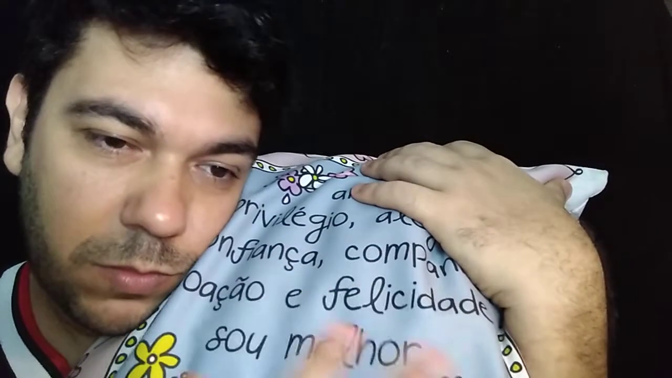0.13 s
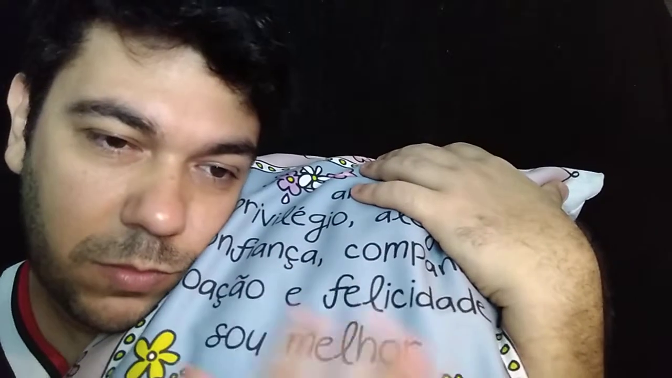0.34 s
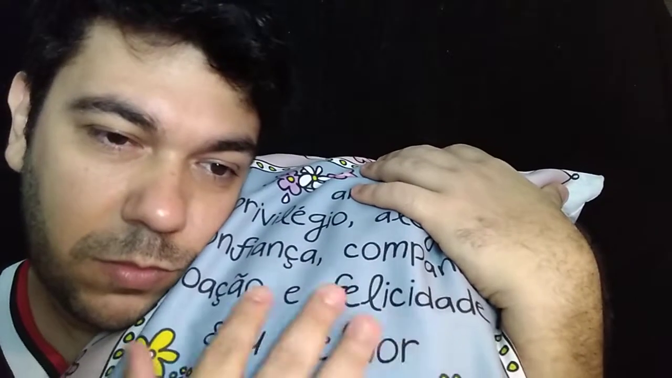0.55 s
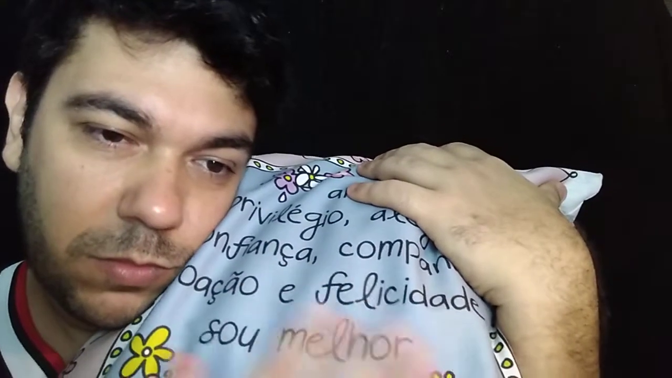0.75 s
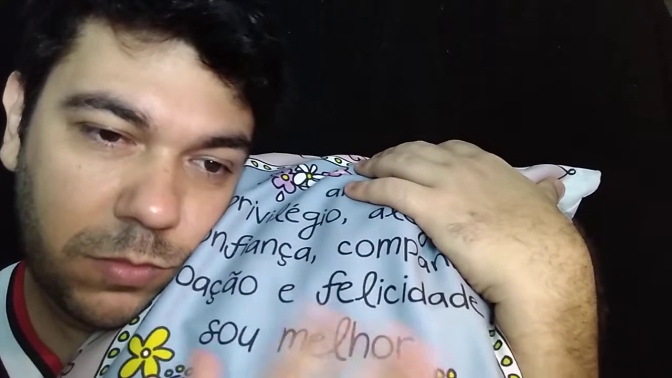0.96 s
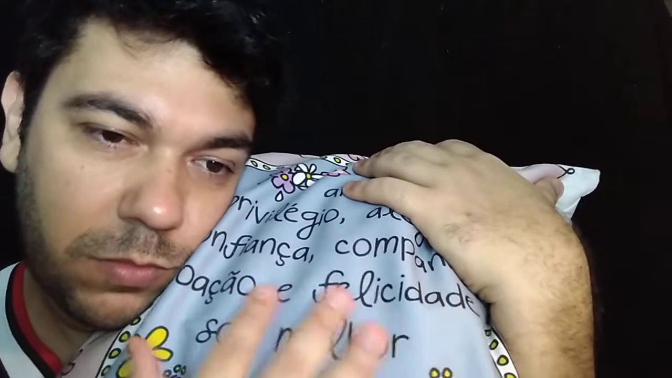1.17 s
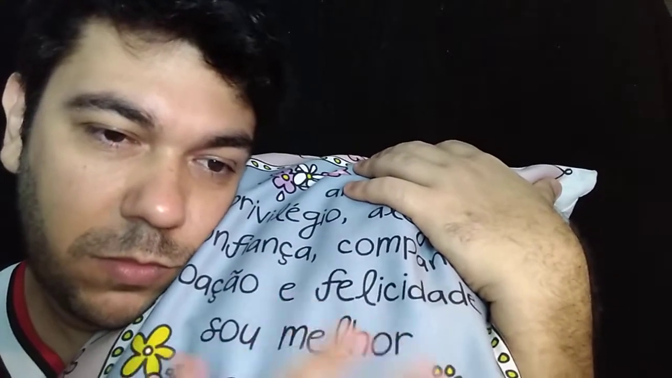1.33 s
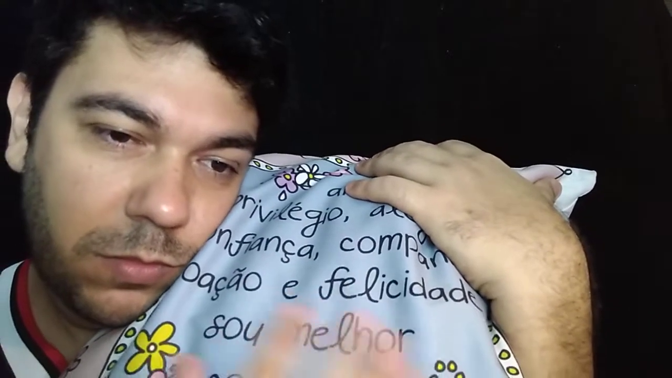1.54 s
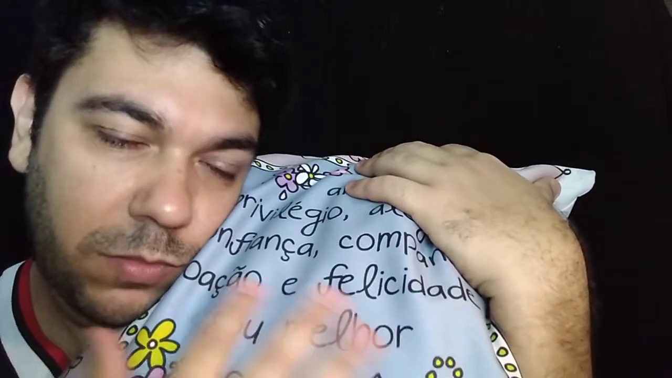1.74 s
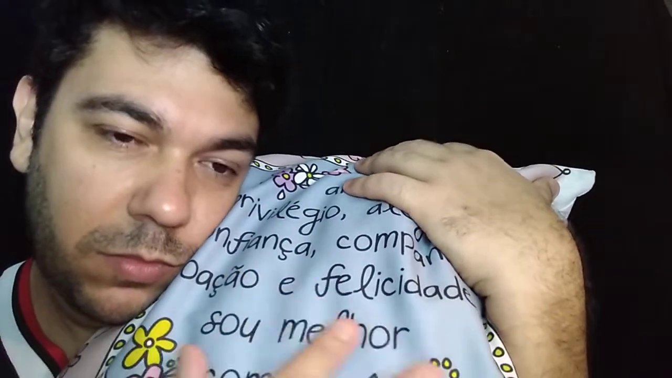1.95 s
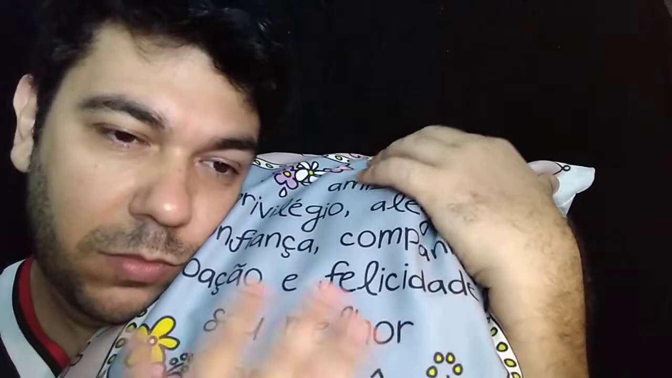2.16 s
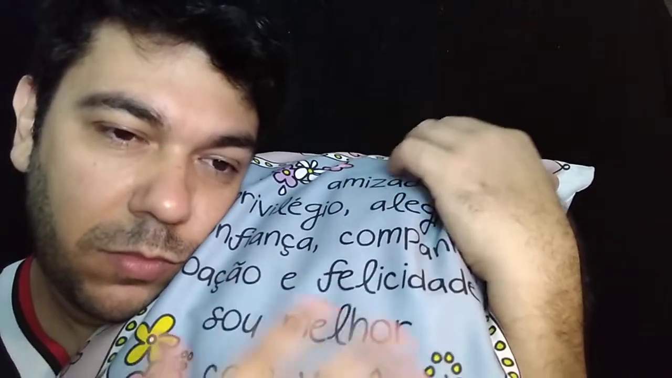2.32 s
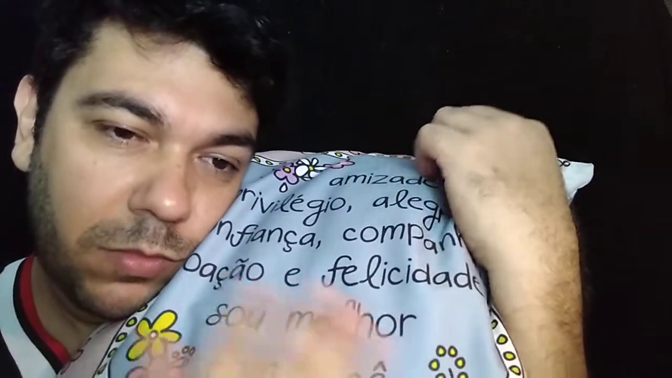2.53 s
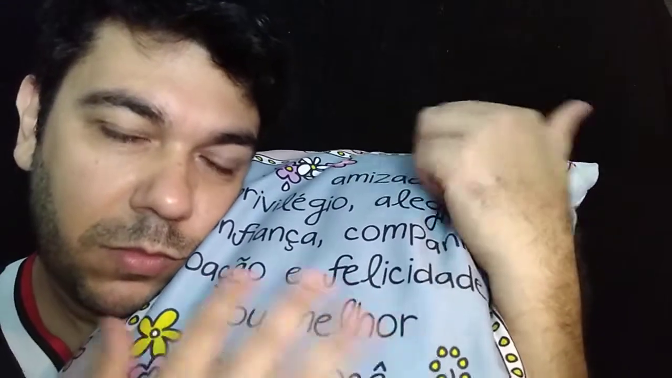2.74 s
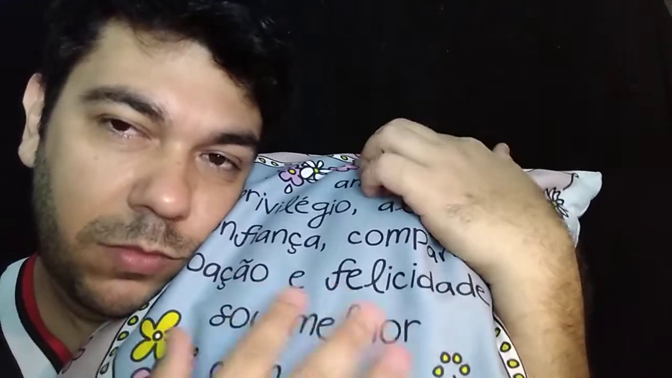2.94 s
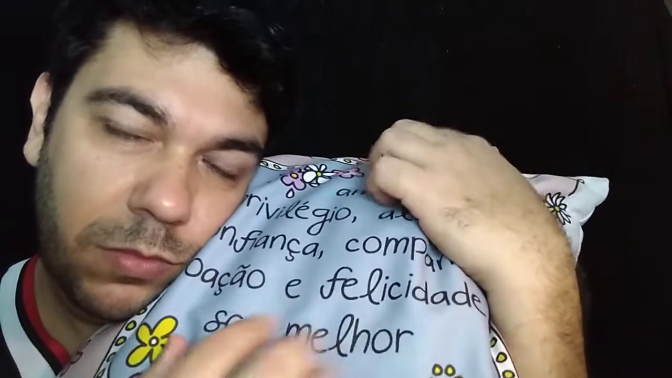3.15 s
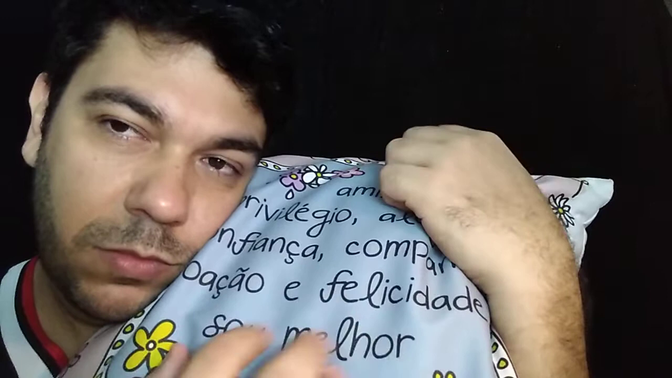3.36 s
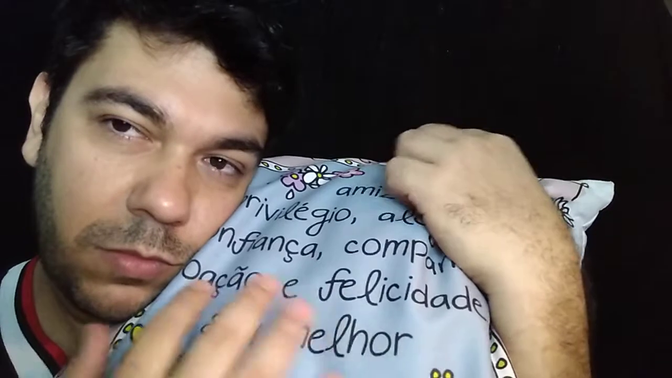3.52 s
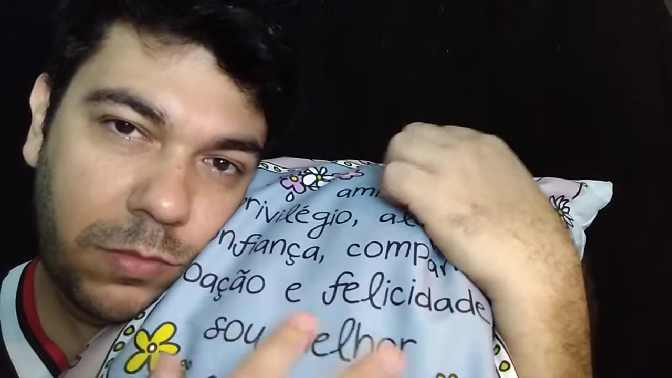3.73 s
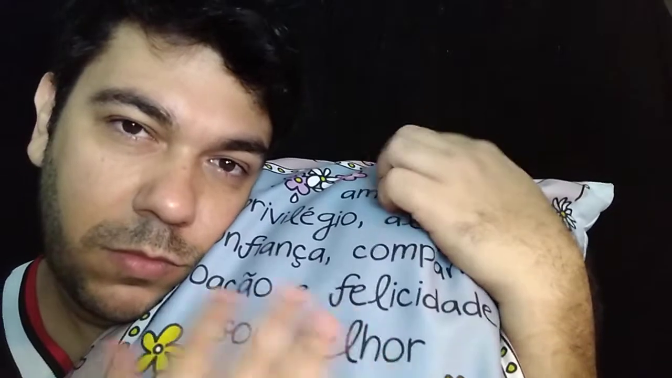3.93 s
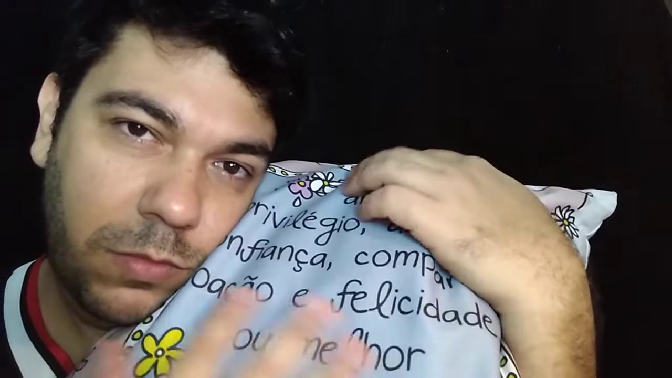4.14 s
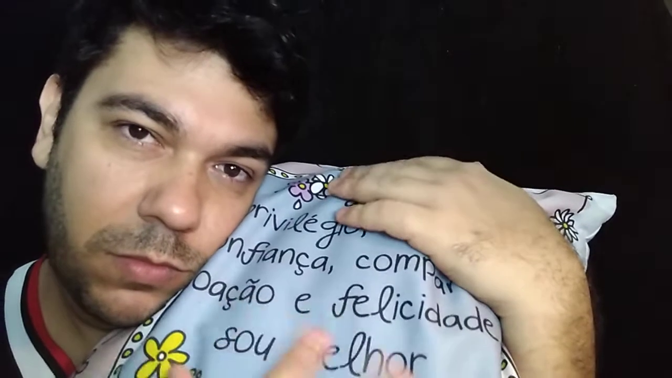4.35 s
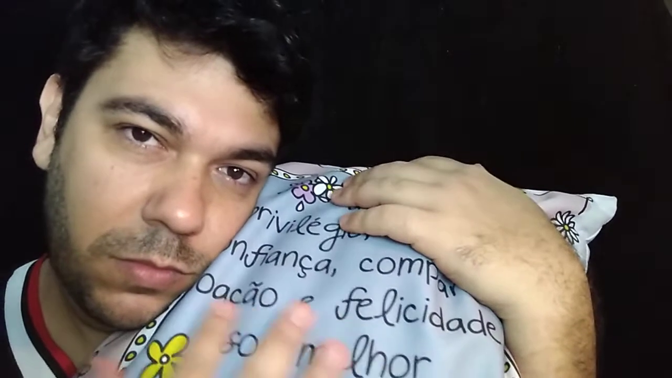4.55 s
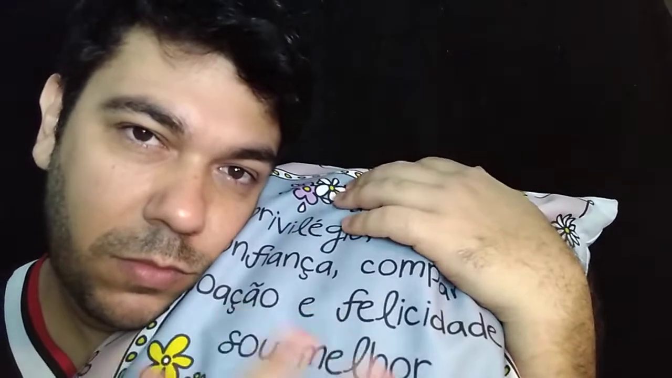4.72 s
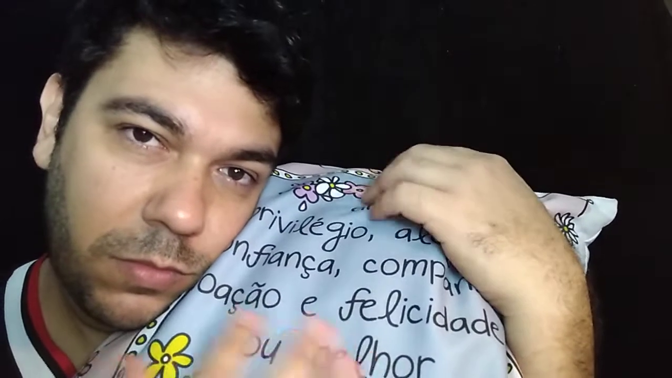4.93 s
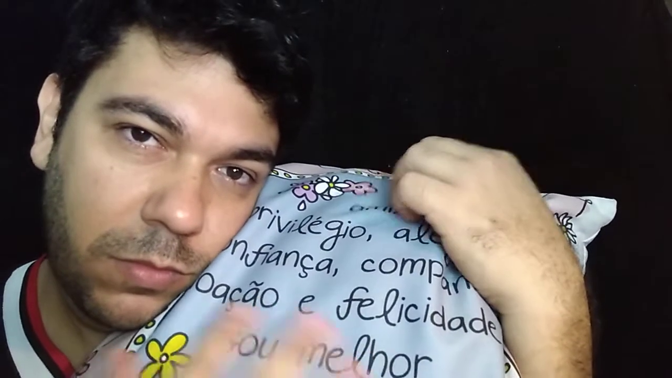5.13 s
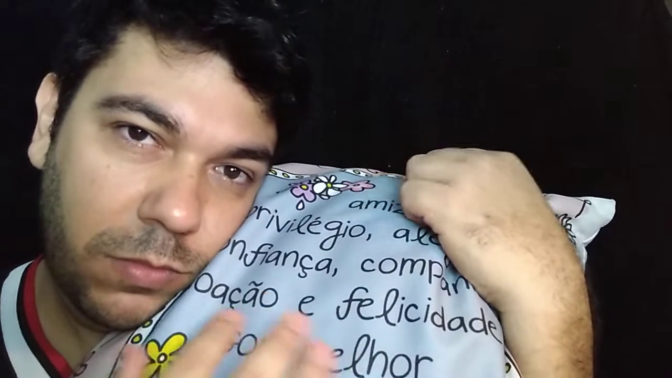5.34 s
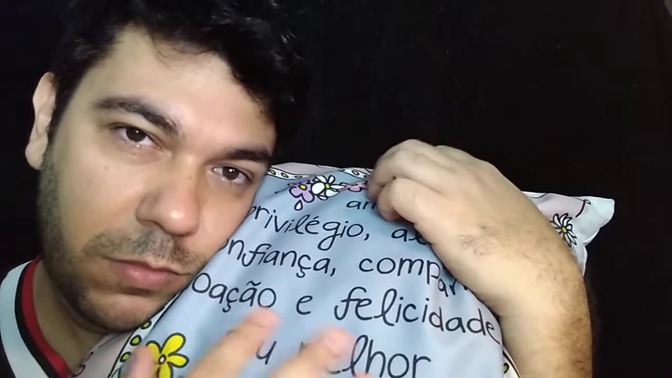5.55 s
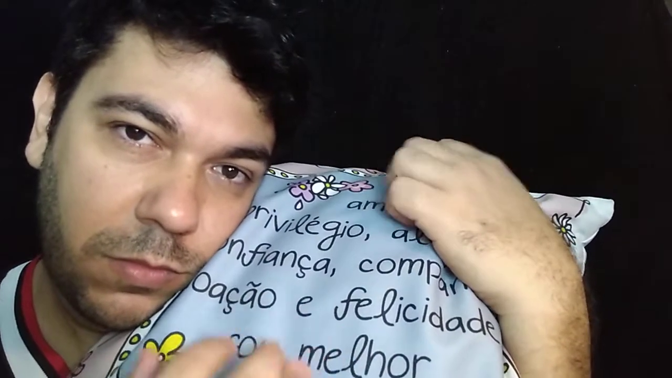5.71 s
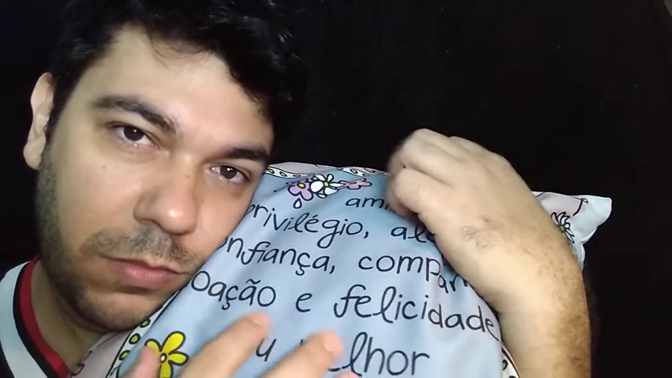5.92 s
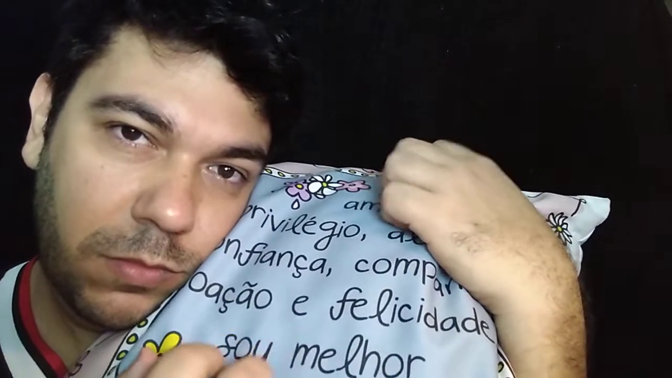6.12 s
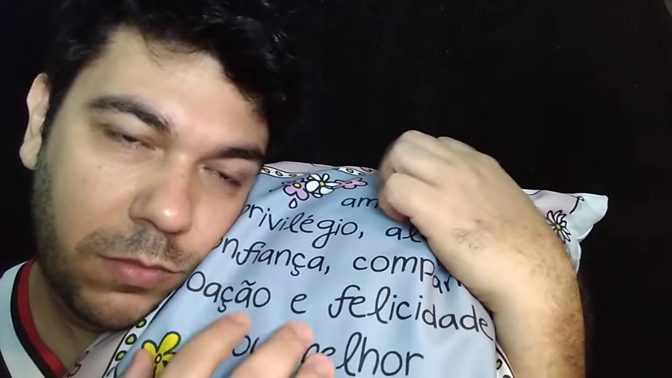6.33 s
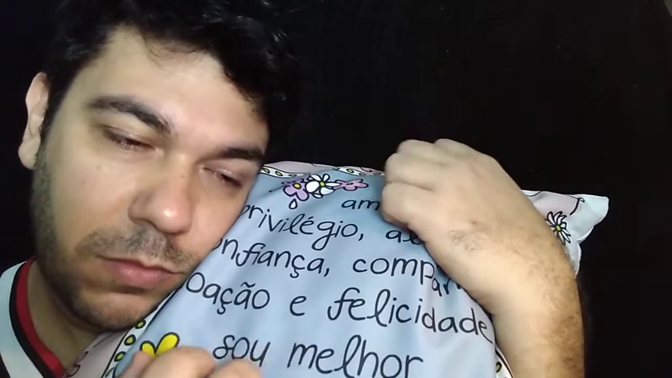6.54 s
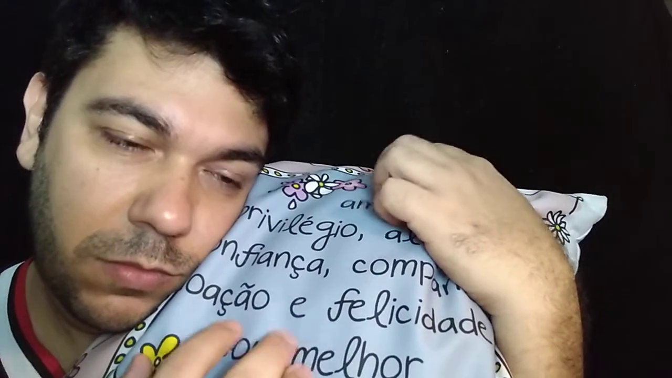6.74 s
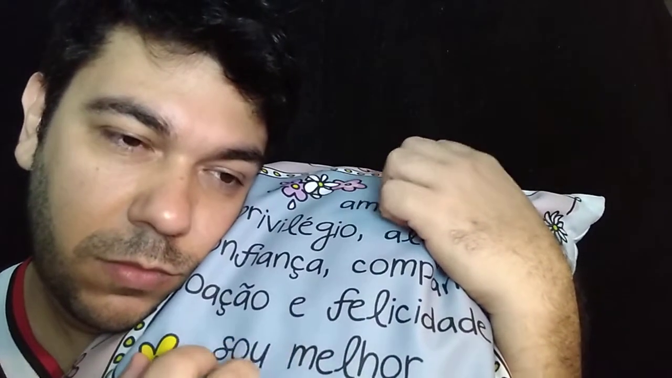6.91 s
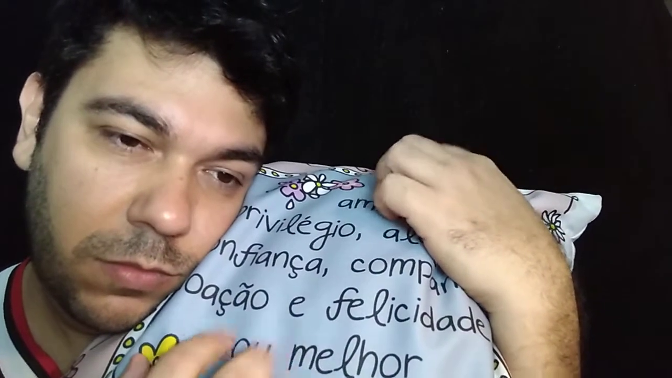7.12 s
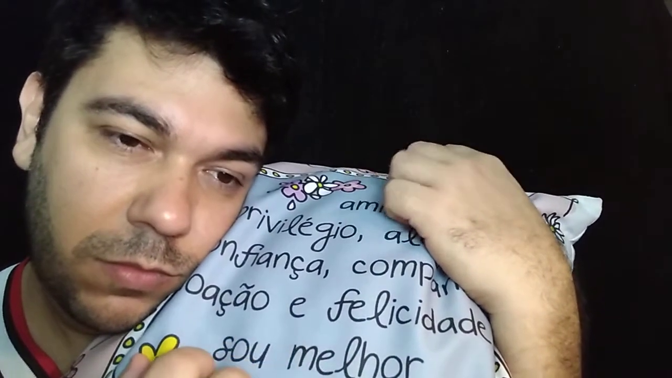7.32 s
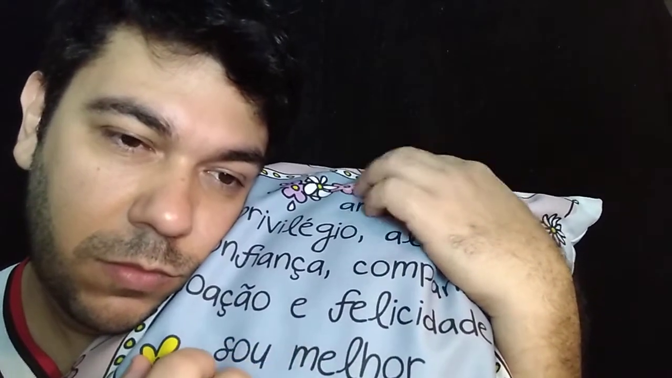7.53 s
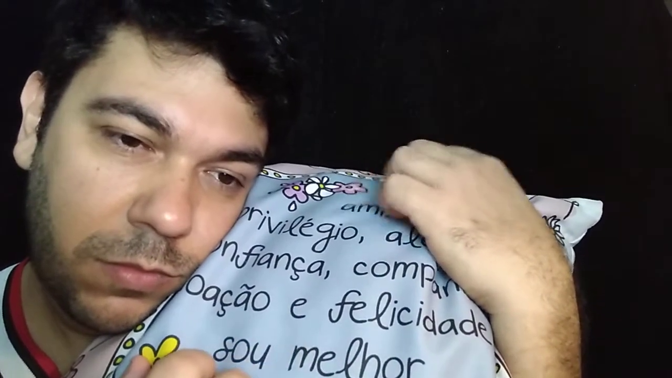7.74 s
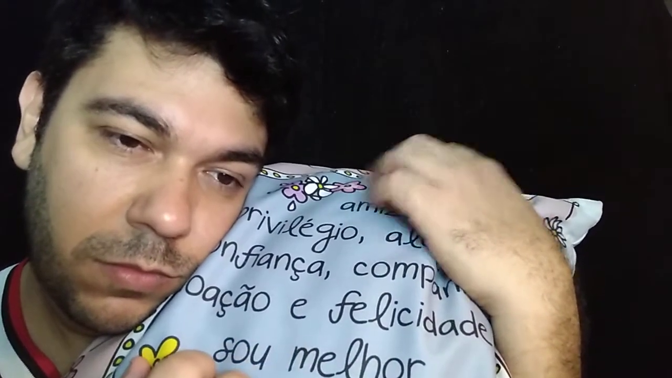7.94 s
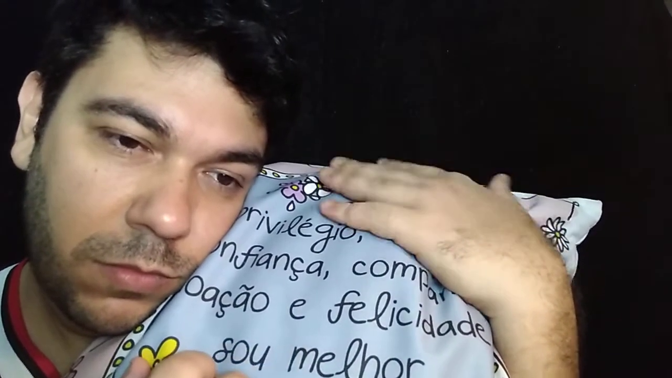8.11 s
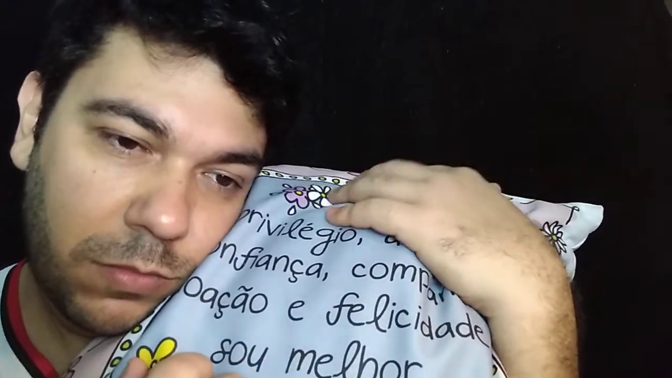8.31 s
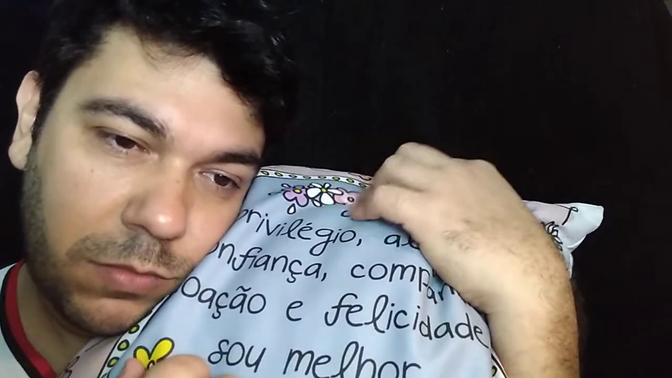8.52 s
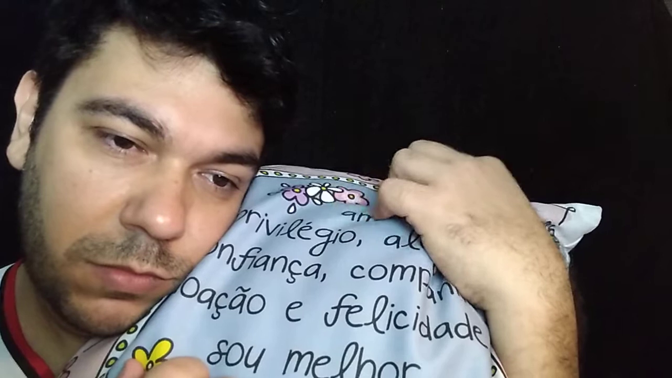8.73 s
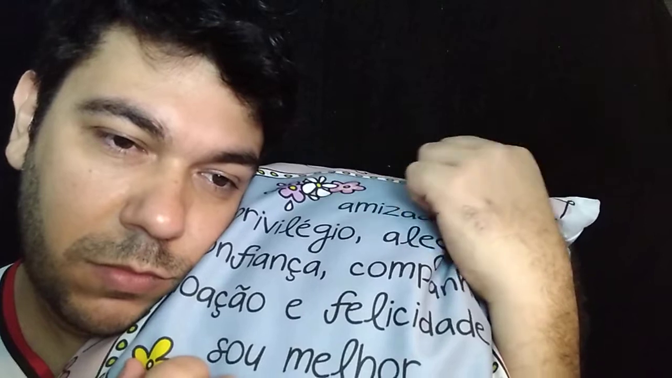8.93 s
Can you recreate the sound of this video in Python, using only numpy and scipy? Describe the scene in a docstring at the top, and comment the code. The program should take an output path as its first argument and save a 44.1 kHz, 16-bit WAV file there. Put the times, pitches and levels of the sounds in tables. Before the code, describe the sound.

Crisp, fizzy scratching of fingertips over pillow fabric, quick and rhythmic, gradually softer and sparser, almost pausing before a last short swipe.

```python
"""In a quiet room, close to a stereo microphone, fingers sweep fast to and fro over a cotton pillow.
They slow down, almost stop and start again. Noise made of many tiny random slips is the fibres' fizz,
the scrape of the nails and the rustle of the cover; all three swell with the speed of the hand.
Lower slips, swelling with its squeeze, are the rumbling stuffing; fading low waves are dull thuds.
Pushed air, a soft room hiss, a brief thin hiss and a faint steady tone lie underneath."""
import sys
import numpy as np
from scipy import signal
from scipy.fft import rfft, irfft, next_fast_len
from scipy.io import wavfile
from scipy.ndimage import uniform_filter1d

SR = 44100
rng = np.random.default_rng(int(sys.argv[2]) if len(sys.argv) > 2 else 0)


def unload_wav(signal):
    """Save mono or channel-first audio to the path in sys.argv[1] as 16-bit WAV at rate SR, clipped to [-1, 1]."""
    wavfile.write(
        sys.argv[1],
        SR,
        np.round(np.clip(np.atleast_2d(signal).T, -1, 1) * 32767).astype(np.int16),
    )


N = 395577  # length of the scene in samples


def gain_of(db):
    """Turns decibels into a factor on the sound wave."""
    return 10 ** (np.asarray(db) / 20)


def evened(x):
    """Scales a signal to an average strength (rms) of 1."""
    return x / np.sqrt(np.mean(x ** 2) + 1e-20)


def read_table(points, hz):
    """Reads a table between its points, on a logarithmic frequency axis."""
    table_hz, value = np.transpose(points)
    return np.interp(np.log(hz + 1), np.log(table_hz + 1), value)


def read_over_time(points):
    """Reads a (time, level) table at every sample."""
    return np.interp(np.arange(N) / SR, *np.transpose(points))


def add(mix, start_s, sound):
    """Mixes a sound in at start_s seconds."""
    part = mix[round(start_s * SR):][:len(sound)]
    part += sound[:len(part)]


# how alike the two microphone ports hear the slips: (frequency [Hz], likeness [0 to 1])
LIKENESS = [(60, 0.61), (200, 0.89), (400, 0.98), (800, 0.84), (1300, 0.63), (2400, 0.81), (4000, 0.14),
            (8000, 0.029)]
LEAD_S = 0.0001  # the left port hears the shared part first


def slips(spectrum, per_s, spread_db, patchy_db, size=512):
    """Random slips of uneven size, coloured, in drifting patches; the ports share bass more than treble."""
    happens = rng.random(N) < per_s / SR
    sizes = happens * gain_of(spread_db * np.minimum(rng.exponential(1, N), 5))
    hz, _, (left, other) = signal.stft(sizes * rng.standard_normal((2, N)), SR, nperseg=size)
    patches = uniform_filter1d(rng.standard_normal(left.shape), size=3, axis=0)  # across pitch
    patches = evened(uniform_filter1d(patches, size=9, axis=1))  # across time
    alike = np.clip(read_table(LIKENESS, hz), 0, 1)[:, None]
    delay = np.exp(-2j * np.pi * hz * LEAD_S)[:, None]
    right = alike * left * delay + np.sqrt(1 - alike ** 2) * other
    colour_db = read_table(spectrum, hz)[:, None] + patchy_db * patches
    coloured = np.array([left, right]) * gain_of(colour_db)
    return evened(signal.istft(coloured, SR, nperseg=size)[1][:, :N])


# colour of the room hiss: (frequency [Hz], relative level [dB])
ROOM_SPECTRUM = [(18, -33), (30, 4.5), (81, 1.5), (161, 4), (294, -7.5), (981, -32.5), (9110, -14.5),
                 (11800, -6), (15800, -16.5)]
# colour of the thin high hiss: (frequency [Hz], relative level [dB])
THIN_SPECTRUM = [(10900, -55), (11300, 0), (11550, -4), (11800, -25), (12100, -49)]
# how the thin hiss comes and goes: (time [s], level [dB])
THIN_LEVEL = [(2.35, -90), (2.55, -66), (3.1, -65.5), (3.4, -59), (3.55, -66), (3.7, -90)]
ROOM_DB = -90.5
TONE_HZ, TONE_DB = 11849, -103


def room():
    """Soft hiss is noise with its own colour; a faint sine runs through, and a thin hiss joins for a while."""
    t = np.arange(N) / SR
    hiss = gain_of(ROOM_DB) * slips(ROOM_SPECTRUM, SR, spread_db=0.1, patchy_db=2.5, size=2048)
    tone = gain_of(TONE_DB) * np.sqrt(2) * np.sin(2 * np.pi * TONE_HZ * t)
    present = (t > THIN_LEVEL[0][0]) * (t < THIN_LEVEL[-1][0])
    thin_gain = gain_of(read_over_time(THIN_LEVEL)) * present
    thin = thin_gain * slips(THIN_SPECTRUM, SR, spread_db=0.2, patchy_db=2.5, size=2048)
    return hiss + tone + thin


# colour of the pushed air: (frequency [Hz], relative level [dB])
DRAUGHT_SPECTRUM = [(15, -23.5), (40, 1), (65, -4.5), (110, 2.5), (200, -14), (500, -80.5)]
# pushed air at the microphone, for a hiss averaging -44 dB: (time [s], level [dB])
DRAUGHT_LEVEL = [(0, -65), (2.45, -68.5), (2.95, -93), (3.55, -81), (4.9, -73.5), (5.3, -88), (6, -93)]


def draught(hiss):
    """Fast strokes push air out, a low flutter that grows with the average strength of the hiss."""
    pace = uniform_filter1d(hiss, size=12000) / gain_of(-44.0)
    air = slips(DRAUGHT_SPECTRUM, 120, spread_db=4.5, patchy_db=7.5, size=2048)
    return gain_of(read_over_time(DRAUGHT_LEVEL)) * pace * air


# a fingertip drops into the pillow: (time [s], level of the push [dB], pitch [Hz])
THUDS = [(0.107, -41.5, 180.0), (0.12, -45.5, 252.0), (0.148, -45, 203), (0.193, -48.5, 162.0),
         (0.262, -49, 124.0), (0.578, -49, 147), (0.696, -70, 274.0), (0.774, -52, 124), (0.866, -41, 146),
         (0.877, -46, 163), (1.096, -50, 168.0), (1.191, -47, 137.0), (1.381, -52, 128),
         (1.619, -54, 257.0), (1.683, -47.5, 179.0), (1.988, -46.5, 201), (2.303, -54, 245.0),
         (2.338, -50, 265.0), (3.598, -39.5, 161), (3.792, -49.5, 290), (3.94, -42, 149), (3.961, -38, 200),
         (4.113, -48.5, 253), (4.612, -49, 166), (4.922, -47.5, 149.0), (5.687, -64, 150),
         (5.895, -57, 196), (6.126, -50.5, 207), (6.61, -58, 200), (6.962, -50, 320), (7.306, -45, 289.0),
         (7.33, -52, 273.0), (7.538, -69, 170), (7.852, -70, 318), (7.881, -62, 180), (8.817, -48, 213.0),
         (8.823, -52, 250)]
# ring of the pillow: (frequency [Hz], width [Hz], relative level [dB])
PILLOW_RING = [(155, 45, -24.5), (309, 22.5, 15.5), (470, 80, 13)]


def thuds():
    """A short inward push that swings back, a faint ring of the pillow and a puff from the cover."""
    out, t = np.zeros((2, N)), np.arange(2600) / SR
    ring = 0
    for hz, width_hz, db in PILLOW_RING:
        ring = ring + gain_of(db) * np.exp(-np.pi * width_hz * t) * np.sin(2 * np.pi * hz * t)
    chance = rng.standard_normal((len(THUDS), len(t) + 1))
    for (start_s, db, hz), (side, *air) in zip(THUDS, chance):
        push = np.sin(2 * np.pi * hz * t) * (hz * t) ** 0.17 * np.exp(-1.6 * hz * t)
        puff = uniform_filter1d(air, size=8) * np.exp(-t / 0.0065)
        thud = push / push.max() + gain_of(-23.5) * ring + gain_of(-14.5) * puff
        # soft: no slow push
        thud = signal.sosfilt(signal.butter(2, 0.4 * hz, "high", fs=SR, output="sos"), thud)
        # each thud leans a random amount to one side; minus makes the push go inward
        add(out[0], start_s, -gain_of(db + 0.66 * side) * thud)
        add(out[1], start_s, -gain_of(db - 0.87 * side) * thud)
    return out


# colour of the rumble: (frequency [Hz], relative level [dB])
RUMBLE_SPECTRUM = [(120, -65.5), (250, -9.5), (315, 2), (380, -2.5), (450, 1.5), (540, -2.5), (640, -14),
                   (850, -7.5), (1300, -23.5), (2500, -66)]
# colour of the deep part: (frequency [Hz], relative level [dB])
DEEP_SPECTRUM = [(60, -39.5), (95, -18), (125, -7.5), (160, -2.5), (210, -2.5), (260, -23.5), (500, -60)]
DEEP_HANGS = 0.22  # exponent: the deep part hangs on under a light squeeze


def stuffing(squeeze, pressed):
    """The filling shifts in lumps under the hand, a dull rumble that quietens at the turns."""
    rumble = slips(RUMBLE_SPECTRUM, 2500, spread_db=2.5, patchy_db=1.46, size=2048)
    dull = signal.sosfiltfilt(signal.butter(4, 640, fs=SR, output="sos"), rumble)
    # a light touch stays dull
    rumble = dull + (rumble - dull) * (squeeze / gain_of(-59.5)) ** 0.5
    deep_db = uniform_filter1d(for_each_stroke(np.transpose(STROKES)[-1]), size=2000)
    deep = slips(DEEP_SPECTRUM, 300, spread_db=2.5, patchy_db=0.5, size=2048)
    deep = gain_of(deep_db) * pressed ** -DEEP_HANGS * deep
    return squeeze * (rumble + deep)


# colour of the fine fibres: (frequency [Hz], relative level [dB])
FIZZ_SPECTRUM = [(3000, -58), (4200, -28), (5500, -10), (7500, -2.5), (10000, 1.5), (12500, -0.5),
                 (14500, 0.5), (16000, -5)]
# colour of the nails on the weave: (frequency [Hz], relative level [dB])
SCRAPE_SPECTRUM = [(1200, -28), (2000, -7), (2600, -4.5), (3500, -2.5), (4800, -4), (5600, -2.5),
                   (7000, -4), (9000, -13.5), (12000, -33)]
# colour of the dragged cover: (frequency [Hz], relative level [dB])
RUSTLE_SPECTRUM = [(400, -22), (650, -5.5), (850, 0), (1100, -3.5), (1450, 1.5), (1730, -3), (1950, -6),
                   (2600, -8), (5000, -68)]


def cloth(hiss, share, rustle_db, scrape_db, pan_db):
    """Fine fibres fizz, nails scrape the weave, and the cover rustles as it is dragged."""
    fizz = share ** 0.12 * slips(FIZZ_SPECTRUM, 25000, spread_db=-1.3, patchy_db=1.6)
    scrape = gain_of(scrape_db) * slips(SCRAPE_SPECTRUM, 15000, spread_db=0.5, patchy_db=1.4)
    # the rustle hangs on at low speed, when the fizz fades
    rustle = slips(RUSTLE_SPECTRUM, 8000, spread_db=-2.1, patchy_db=1.26)
    rustle = gain_of(rustle_db) * share ** -0.12 * rustle
    # the skin grips and lets go a little unevenly
    grip = uniform_filter1d(rng.standard_normal(N), size=900)
    grip = evened(uniform_filter1d(grip, size=900))
    sides = gain_of([pan_db / 2, -pan_db / 2])
    return hiss * gain_of(0.65 * grip) * (fizz + scrape + rustle) * sides


def for_each_stroke(values):
    """Holds one value for each stroke; a pair alternates, out and back."""
    stroke = np.searchsorted(np.transpose(STROKES)[0], np.arange(N) / SR, "right") - 1
    return np.array(values)[stroke % len(values)]


STICK_BEFORE_S, STICK_AFTER_S = 0.0063, 0.0086  # the skin holds still around each turn
RISE_POWER, FALL_POWER = (1.28, 0.95), (1.24, 1.064)  # (out, back): exponents on the quarter sine
USUAL_HALF_S, LINGER = 0.095, 0.48  # longer half strokes linger near the turn: length ** LINGER


def arches(top, top_db, turn_db, rise, fall):
    """Quarter sines from each turn up to a top and down to the next; the skin sticks at the turns."""
    turn, t = np.append(np.transpose(STROKES)[0], LAST_TURN_S), np.arange(N) / SR
    k = np.clip(np.searchsorted(turn, t, "right") - 1, 0, len(top) - 1)  # stroke number
    held, free = turn[k + 1] - STICK_BEFORE_S, turn[k] + STICK_AFTER_S
    rising = t < top[k]
    half = np.maximum(np.where(rising, top[k] - free, held - top[k]), 1e-3)
    power = np.where(rising, rise * for_each_stroke(RISE_POWER), fall * for_each_stroke(FALL_POWER))
    power = power * (half / USUAL_HALF_S) ** LINGER
    nearness = np.clip(1 - abs(t - top[k]) / half, 0, 1)  # 0 at the turn, 1 at the top
    height = np.sin(np.pi / 2 * nearness) ** power
    low, high = gain_of(np.where(rising, turn_db[k], turn_db[k + 1])), gain_of(top_db[k])
    level = low + (high - low) * height
    share_of_top = uniform_filter1d(level / high, size=300)
    return level, share_of_top


# one row a stroke, out and back in turn: (hand turns [s], hiss there [dB], hand fastest [s],
# hiss there [dB], filling squeezed hardest [s], rumble there [dB], deep part over the rumble [dB])
STROKES = [(0.0, -59.5, 0.128, -38.5, 0.111, -60.5, -10), (0.181, -60.5, 0.25, -44, 0.214, -59.5, -7),
           (0.35, -64.5, 0.435, -41.5, 0.448, -60.5, -2.5), (0.491, -58.5, 0.541, -42.5, 0.56, -59.5, -11),
           (0.644, -62.5, 0.716, -40.5, 0.713, -59, -8), (0.789, -57, 0.855, -41, 0.883, -60, -3),
           (0.953, -63.5, 1.041, -42, 1.03, -61, -10), (1.101, -57.5, 1.159, -42, 1.153, -60.7, -4),
           (1.246, -65.5, 1.331, -42, 1.299, -63.2, -6), (1.395, -57.5, 1.452, -41.5, 1.421, -59.5, -8),
           (1.563, -63.5, 1.644, -41.5, 1.629, -61.5, -5), (1.716, -59, 1.792, -41.5, 1.745, -60, -4),
           (1.893, -65.4, 1.988, -40.2, 1.982, -64, -5), (2.05, -55.5, 2.116, -41.5, 2.122, -62, -6),
           (2.214, -63, 2.305, -41.5, 2.295, -63, -9), (2.37, -56, 2.449, -42.5, 2.398, -60, -8.5),
           (2.561, -55, 2.659, -39, 2.648, -60.0, -5.5), (2.72, -53, 2.791, -41, 2.75, -60, -4),
           (2.894, -58.5, 2.983, -44.5, 2.969, -60, -22), (3.085, -65, 3.256, -44.5, 3.286, -55.5, -12),
           (3.386, -55, 3.436, -47.5, 3.433, -56, -21), (3.5, -52, 3.568, -43.5, 3.617, -59, -7),
           (3.67, -64.5, 3.784, -40.5, 3.803, -57.5, -10.5), (3.837, -55, 3.884, -41, 3.959, -58.5, -10),
           (3.993, -63, 4.105, -41, 4.114, -62, -4), (4.157, -55, 4.218, -42.5, 4.182, -58.5, -7),
           (4.32, -62.5, 4.435, -40.5, 4.383, -62.5, -14.5), (4.489, -57.5, 4.558, -42, 4.605, -58, -9.5),
           (4.654, -64.5, 4.751, -40, 4.712, -65, -15), (4.803, -59, 4.866, -43.5, 4.835, -59.5, -10),
           (4.966, -58, 5.085, -45.5, 5.035, -64.8, -13), (5.135, -59, 5.2, -43, 5.309, -57, -11),
           (5.36, -59.5, 5.488, -46.5, 5.487, -59, -18.5), (5.599, -60, 5.679, -48.5, 5.718, -58, -14),
           (5.87, -58.5, 5.929, -48.5, 5.927, -60, -13), (6.03, -60, 6.077, -48.5, 6.186, -53, -14),
           (6.274, -60.5, 6.32, -44.5, 6.37, -64, -21), (6.448, -65, 6.525, -47, 6.57, -57, -21),
           (6.648, -68, 6.719, -45.5, 6.729, -59.5, -14), (6.822, -71.5, 6.875, -49, 6.95, -57.1, -13),
           (7.018, -69, 7.075, -48.5, 7.062, -60.5, -15), (7.171, -64.5, 7.211, -48, 7.318, -55, -9.5),
           (7.394, -69.5, 7.513, -53, 7.48, -65.5, -14), (7.649, -80.3, 7.839, -57, 7.845, -56.5, -19),
           (7.919, -73, 7.987, -54.5, 7.972, -64, -26), (8.226, -90, 8.66, -68, 8.665, -66.5, -7),
           (8.792, -85, 8.91, -59.5, 8.834, -60.5, -10.5)]
LAST_TURN_S, LAST_TURN_DB = 9.1, -59  # end of the last stroke and its hiss
# the touch of nails and soft pads changes: (time [s], factors on the exponents of rise [x], fall [x]
# and squeeze [x], change of scrape [dB], change of rustle [dB])
TOUCH = [(0.0, 0.81, 1, 0.35, -0.3, -1.1), (2.8, 1.14, 1.1, 0.48, 0, -1.1),
         (3.0, 1.5, 0.41, 1.1, -0.5, -0.5), (3.3, 3.4, 2.3, 2.7, -6.5, -3.5),
         (3.55, 1.9, 1.2, 1.1, -3.5, -2), (3.9, 1.02, 0.84, 0.33, -0.5, -0.3),
         (4.9, 0.79, 0.69, 0.45, 0.4, 0.7), (5.25, 1.2, 2.5, 0.46, -1.5, 0), (5.7, 1.8, 0.73, 3.3, -4, -1),
         (6.15, 1.9, 0.73, 0.7, -4, 1), (6.4, 1.5, 1.83, 1.1, -3.5, 1.5), (7.1, 2.4, 1.6, 0.96, -5, 0),
         (7.5, 3.6, 1.7, 1.8, -3, 4.5), (7.7, 2.9, 2.7, 1.6, -3, 0), (7.88, 4.4, 3.5, 2.1, -3.5, 6),
         (8.1, 2.5, 2.75, 2.9, 1.5, 4), (8.45, 2.6, 2.3, 4.4, -4, -6), (8.77, 4, 4.8, 2.5, -7, -4),
         (8.81, 1.7, 1.5, 0.55, -4, 6.5)]
# (out, back) in dB: rustle over the hiss, scrape over the fizz, left minus right
RUSTLE_DB, SCRAPE_DB, PAN_DB = (-14.5, -12), (-4, -3), (0.15, 0.6)
RUMBLE_AT_TURN_DB, RUMBLE_FOLLOWS = -69, 0.88  # at a turn with -62 dB hiss; dB per dB of that hiss
DRAG = 0.1  # how far the rustle follows the squeeze on the filling rather than the speed
LET_GO = 1.1  # the squeeze ends faster than it builds: factor on its falling exponent


def hand():
    """Hiss follows the speed of each stroke, rumble its squeeze; colour follows direction and touch."""
    _, turn_db, top, top_db, hardest, hardest_db, _ = np.transpose(STROKES)
    touch_s, *columns = np.transpose(TOUCH)
    t = np.arange(N) / SR
    rise, fall, knead, nails_db, pads_db = (np.interp(t, touch_s, column) for column in columns)
    turn_db = np.append(turn_db, LAST_TURN_DB)
    hiss, share = arches(top, top_db, turn_db, rise, fall)
    rest_db = RUMBLE_AT_TURN_DB + RUMBLE_FOLLOWS * (turn_db + 62)
    squeeze, pressed = arches(hardest, hardest_db, rest_db, knead, LET_GO * knead)
    squeeze = uniform_filter1d(squeeze, size=300)
    rustle_db, scrape_db, pan_db = (
        uniform_filter1d(for_each_stroke(pair), size=600) for pair in (RUSTLE_DB, SCRAPE_DB, PAN_DB))
    rustle_db = rustle_db + pads_db + DRAG * 20 * np.log10(pressed / share)
    return squeeze, pressed, hiss, share, rustle_db, scrape_db + nails_db, pan_db


def scene():
    """One hand motion drives the cover, the filling and the pushed air."""
    squeeze, pressed, hiss, *colour = hand()
    background = room() + draught(hiss)
    pillow = thuds() + stuffing(squeeze, pressed)
    return background + pillow + cloth(hiss, *colour)


# the hollow between pillow and microphone: (frequency [Hz], width [Hz], lift [dB])
HOLLOW = [(860, 120, 0.5), (1056, 180, 4.5), (1333, 61, 2), (1710, 47, -7), (1950, 22, 7.5), (2260, 92, 2)]
EDGE_HZ = 15760  # upper band limit


def record(dry):
    """The hollow between pillow and microphone lifts or dips a few narrow bands; then the band limit."""
    size = next_fast_len(N)
    hz = np.fft.rfftfreq(size, 1 / SR)
    lift_db = sum(db / (1 + (2 * (hz - f) / width) ** 2) for f, width, db in HOLLOW)
    near = irfft(rfft(dry, size) * gain_of(lift_db), size)[:, :N]
    low_pass = signal.firwin(2401, EDGE_HZ, window=("kaiser", 7), fs=SR)
    return signal.oaconvolve(near, low_pass[None], "same")


dry = scene()
out = record(dry)
unload_wav(out)
```